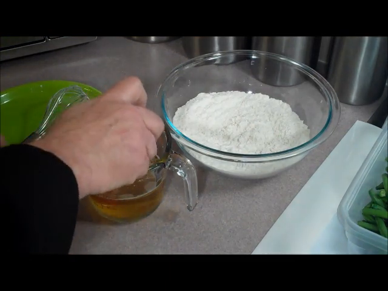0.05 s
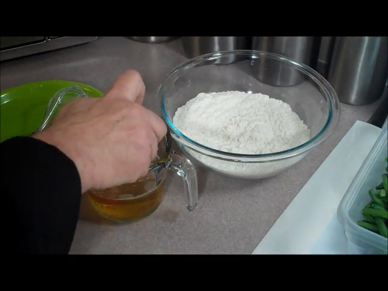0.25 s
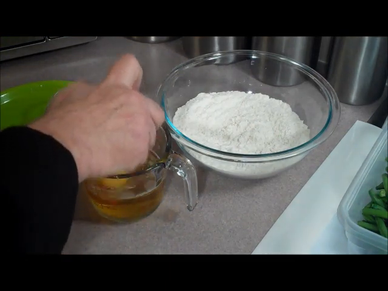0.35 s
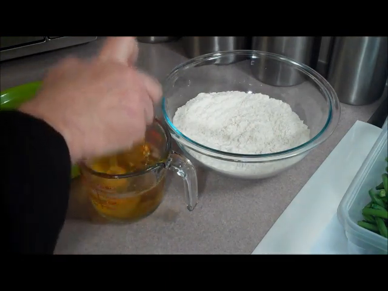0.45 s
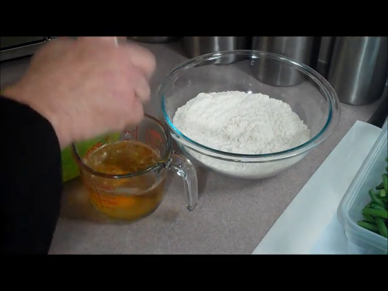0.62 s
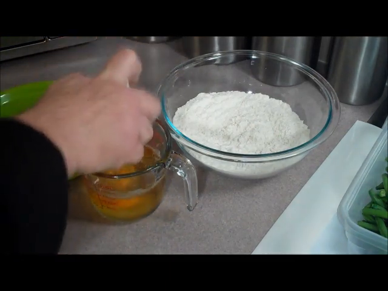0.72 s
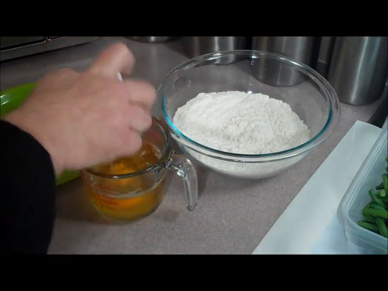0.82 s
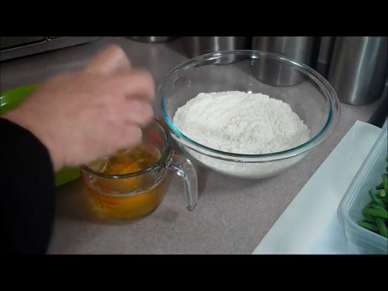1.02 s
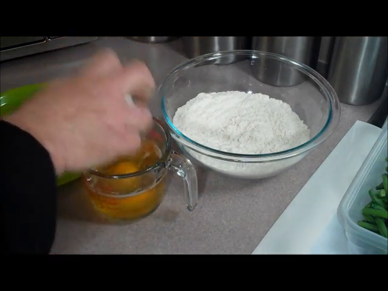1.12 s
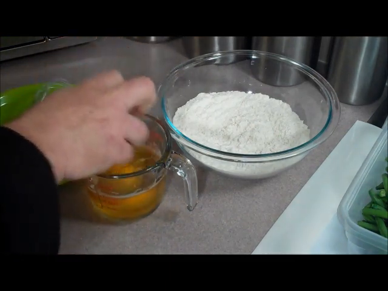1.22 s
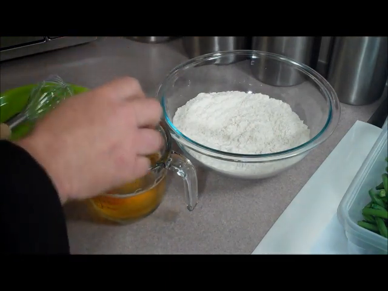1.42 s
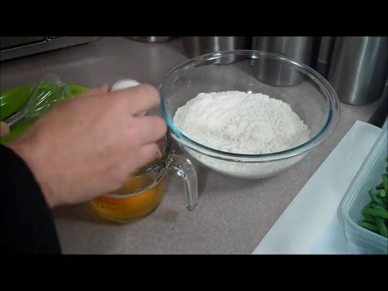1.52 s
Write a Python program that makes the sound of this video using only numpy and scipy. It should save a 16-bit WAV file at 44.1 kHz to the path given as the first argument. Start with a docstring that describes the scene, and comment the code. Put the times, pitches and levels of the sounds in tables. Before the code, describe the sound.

Eggshell crackles close to the microphone in a quiet kitchen, with one sharp clink on a glass rim. The egg plops gently into the cup and drips, before a hollow pop and a light knock from the wet shell.

```python
"""Crunching eggshell, a clink on a glass measuring cup, a rising gloop and drips, then a hollow pop
and a knock of the shell halves: an egg pulled open in a quiet kitchen.
Fractures and contacts are noise snaps plus damped modes of shell or cup. The sinking egg closes an air
pocket, a gliding tone; each drip of white rings a small bubble. Sticky white crackles, the halves rub."""
import sys
import numpy as np
from scipy import signal
from scipy.fft import rfft, irfft
from scipy.io import wavfile
from scipy.ndimage import uniform_filter1d

SR = 44100
rng = np.random.default_rng(int(sys.argv[2]) if len(sys.argv) > 2 else 0)


def unload_wav(signal):
    """Save mono or channel-first audio to the path in sys.argv[1] as 16-bit WAV at rate SR, clipped to [-1, 1]."""
    wavfile.write(
        sys.argv[1],
        SR,
        np.round(np.clip(np.atleast_2d(signal).T, -1, 1) * 32767).astype(np.int16),
    )


N = 68355

# Spectra. Each row: frequency in Hz, relative gain in dB.
ROOM_TONE_EQ = [(20, 0.5), (60, -5.5), (150, -8), (400, -10.5), (1000, -10.5), (2000, -15.5), (4000, -9),
                (8000, -21), (12000, -29), (14500, -47)]
REVERB_EQ = [(150, -15.5), (450, -10.5), (700, -10), (1150, -7.5), (2000, -10.5), (4000, -8), (8000, -8),
             (14000, -9)]
RUB_EQ = [(80, -8), (200, -6), (330, -1.5), (700, -9), (1150, 6.5), (1700, -2.5), (2300, -2), (3400, -5),
          (5000, -7.5), (10000, -35), (14000, -60)]
WET_EQ = [(150, -34), (500, -4.5), (1050, -3), (1450, 3), (1850, 2), (2400, -3), (3000, 1), (3500, -3),
          (3950, -0.5), (4500, -9.5), (6300, -8.5), (7800, -9), (11000, -20.5), (14000, -51)]
CLINK_EQ = [(150, -37), (600, -23), (1600, 3.5), (2600, 2), (4200, 8.5), (5600, 6.5), (7500, 1.5),
            (11000, -2.5), (15000, -26)]
POP_EQ = [(150, -36), (600, -15.5), (1500, 9), (3400, -7), (4700, 5), (6300, -1.5), (9000, -3.5),
          (12000, -11), (15000, -43)]
KNOCK_EQ = [(100, -19), (300, -11), (700, -11), (2000, -1.5), (3300, 2), (5200, 3), (7500, -12.5),
            (11500, -16), (14000, -60)]
CHIP_EQ = [(200, -22), (600, 4.5), (8000, 0.5), (12000, -3), (15000, -41)]
CRACK_EQ = [(150, -31.5), (400, -22.5), (550, -10), (900, -13), (1150, -28), (1550, -16), (2100, 1),
            (2750, -5), (3800, 0), (5000, 1.5), (6000, -2.5), (7100, -2.5), (8200, -7), (9800, -5.5),
            (12500, -20.5), (15000, -36)]
# Resonances. Each row: frequency in Hz, relative level in dB, T60 in seconds.
CUP_MODES = [(3620, 5.5, 0.01), (3910, 15, 0.0095), (4150, 4, 0.01), (3880, -21, 0.08), (5680, -8, 0.018)]
HOLLOW_MODES = [(885, -3, 0.021), (950, -23, 0.07), (1030, -14, .02), (1704, -4, 0.015)]
POP_MODES = [(613, -17, 0.03), (1020, -2, 0.019), (1200, -6, 0.0093), (1420, 2.5, 0.018), (1560, -2, 0.015),
             (2050, -17, .012), (2745, -5, 0.014), (3837, -15, 0.016), (4666, -8.5, 0.011),
             (5720, -13, 0.017), (6400, -14, 0.023)]
KNOCK_MODES = [(1186, -11.5, 0.028), (2243, -3.5, 0.029), (2925, 0, 0.018), (3290, 1.5, 0.012),
               (4760, -1.5, 0.011)]
SHELL_MODES = [(2027, 2, 0.021), (2280, 3.5, 0.015), (3250, -5, 0.019), (3770, 10.5, 0.01),
               (4280, 2.5, 0.015)]
# Envelopes. Each row: time in seconds, level in dB.
RUB_ENVELOPE = [(1.285, -78), (1.30, -56.5), (1.33, -52.5), (1.35, -76), (1.41, -64), (1.45, -64.5),
                (1.5, -77)]
SQUELCH_ENVELOPE = [(0, -52.5), (.05, -66.5), (.1, -74.5), (.42, -73.5), (.64, -67), (.72, -68.5),
                    (.8, -70), (.86, -65), (.9, -55.5), (.935, -62), (.995, -55.5), (1.045, -68.5),
                    (1.2, -62.5), (1.275, -68), (1.319, -56), (1.35, -58.5), (1.40, -56.5), (1.49, -68.5)]
POCKET_ENVELOPE = [(.573, -68), (.577, -50), (.592, -53.5), (.606, -53), (.632, -58), (.645, -76)]
# Kitchen decay. Each row: frequency in Hz, T60 in seconds.
ROOM_T60 = [(200, 0.23), (900, 0.35), (2000, 0.36), (4000, 0.23), (8000, 0.31), (14000, 0.17)]
# Stereo width. Each row: frequency in Hz, left-right correlation.
CORRELATION = [(30, 1), (150, 0.04), (300, 0.77), (2000, 0.78), (4000, 0.47), (7000, 0.22), (12000, -0.18)]
# Stereo balance. Each row: frequency in Hz, left minus right in dB.
BALANCE = [(50, 1), (500, 3), (1500, 3), (4000, 2.5), (8000, 1.9), (12000, -1)]
# Hand bumps. Each row: start in seconds, level in dB, pitch in Hz, T60 in seconds.
BUMPS = [(0.334, -64.5, 127, 0.23), (1.29, -72, 131, 0.13), (1.315, -60, 320, 0.062)]
# Air in the cup. Each row: start in seconds, level in dB, centre in Hz, half-width in octaves,
# decay in seconds.
CUP_AIR = [(.268, -49.5, 970, .13, .05), (1.14, -43.5, 1230, .24, .055)]
# Drips. Each row: start in seconds, bubble level in dB, pitch in Hz, click level in dB, cutoff in Hz.
DRIPS = [(0.5744, -57, 940, -59, 2500), (0.6146, -55, 1720, -61, 2000), (.627, -57, 1660, -66, 2000),
         (.675, -47.5, 1457, -50, 7200), (.709, -47, 1570, -46, 12200), (.754, -58, 1476, -63, 3000),
         (.872, -51.5, 1580, -52, 10000), (.899, -61, 1650, -55, 7060), (0.9437, -56.5, 1450, -64, 10000),
         (1.0039, -56, 1560, -60, 8000), (1.23, -52, 1470, -57, 8000), (1.442, -53, 1890, -60, 4000)]
# Closing air pocket. Each row: time in seconds, pitch in Hz, level in dB.
GLOOP = [(.598, 477, -67), (0.608, 527, -51.5), (.615, 600, -55), (.623, 720, -57), (0.6268, 927, -41),
         (.632, 1030, -46), (.642, 1306, -50.5), (0.655, 1530, -62)]
# Rim contacts. Each row: start in seconds, then contact, cup ring and hollow knock levels in dB.
CLINKS = [(0.2654, -30.5, -25, -37), (0.2822, -37, -58, -63)]
# Shell pops and one knock. Each row: start in seconds, contact level in dB, ring level in dB.
POPS = [(1.138, -30.5, -27.3), (1.1476, -52, -37)]
KNOCK = (1.2918, -38, -39.5)
# Shell chips. Each row: start in seconds, level in dB, centre in Hz, half-width in octaves.
CHIPS = [(0.1397, -55, 7240, 0.84), (.1725, -52, 5400, 0.71), (.18, -45.5, 3970, 7.5),
         (0.192, -45, 3880, 0.26), (.435, -53, 7900, 1.2), (.450, -55.5, 4870, 0.18),
         (.484, -58, 2000, 0.46), (.502, -54, 5030, 1.07), (0.869, -56, 9100, 0.44),
         (.899, -53.5, 3000, 0.42), (0.942, -51, 7400, 1.4), (1.004, -54.5, 4900, 0.29),
         (1.082, -57.5, 5500, 0.7), (1.097, -58, 5530, .7), (1.106, -57, 4900, 0.62),
         (1.231, -47.5, 2820, 1.06), (1.28, -49, 3950, .3), (1.3657, -50, 2480, 0.89),
         (1.383, -52, 2020, 0.67), (1.4124, -45.5, 7500, 1.14), (1.4218, -47.5, 2610, 1.3)]
# Fractures. Each row: start in seconds, level in dB, decay in seconds, tilt above 2 kHz in dB per
# octave, ring level in dB.
CRACKS = [(0.0, -50.5, 0.0051, 10, -53), (.0045, -41.5, 0.0057, -5, -49), (.027, -45.5, 0.0052, -4, -67),
          (0.2004, -39.5, 0.0052, 2, -42.5), (.2042, -30, 0.0017, 0, -27), (.2078, -33.5, 0.0027, 0.5, -35),
          (0.2122, -42, 0.0094, 2, -49), (0.2216, -42, 0.01, -7, -56), (0.2313, -46, 0.0024, -1, -43),
          (.236, -40, 0.003, -4, -34), (0.2417, -32.5, 0.0027, 3, -55), (.248, -41.5, .003, -3, -39),
          (.322, -51.5, 0.0051, -4, -58)]

FFT_SIZE = 2048
BINS_HZ = np.fft.rfftfreq(FFT_SIZE, 1 / SR)


def amp(db):
    return 10 ** (np.asarray(db) / 20)


def unit_rms(x):
    return x / np.sqrt(np.mean(x ** 2) + 1e-20)


def unit_hit(x):
    """Scale to the energy of 5 ms at rms 1."""
    return x * np.sqrt(.005 * SR / (np.sum(x ** 2, -1, keepdims=True) + 1e-20))


def curve(points, hz=BINS_HZ):
    point_hz, value = np.transpose(points)
    return np.interp(np.log(hz + 1), np.log(point_hz), value)


def band_db(centre_hz, half_width_oct):
    return -10 * np.log10(1 + (np.log2((BINS_HZ + 1) / centre_hz) / half_width_oct) ** 4)


def add(mix, start_s, sound):
    part = mix[:, max(round(start_s * SR), 0):][:, :sound.shape[-1]]
    part += sound[..., :part.shape[1]]


def eq(x, gain_db):
    """Minimum-phase filter, gain given on BINS_HZ."""
    cepstrum = irfft(np.log(amp(np.maximum(gain_db, -90))))
    half = len(cepstrum) // 2
    cepstrum[1:half] *= 2
    cepstrum[half + 1:] = 0
    impulse = irfft(np.exp(rfft(cepstrum)))
    return signal.fftconvolve(x, impulse[None, :half], axes=1)


def stereo(x):
    """Mix two independent signals to left and right with the set correlation."""
    correlation = np.clip(curve(CORRELATION), -.98, .98)
    mid = eq(x[:1], 10 * np.log10((1 + correlation) / 2))
    side = eq(x[1:], 10 * np.log10((1 - correlation) / 2))
    return np.vstack([mid + side, mid - side])


def snap(decay_s, gain_db, rise_s=0.00039):
    """A quick run of tiny fractures: a noise burst, whitened, then filtered."""
    t = np.arange(FFT_SIZE) / SR
    envelope = (1 - np.exp(-(t + 1 / SR) / rise_s)) * np.exp(-t / decay_s)
    burst = envelope * rng.standard_normal((2, FFT_SIZE))
    for _ in range(4):  # flatten the spectrum, restore the envelope
        burst = irfft(np.exp(1j * np.angle(rfft(burst))))
        burst *= envelope / np.sqrt(abs(uniform_filter1d(burst ** 2, size=48)) + 1e-14)
    return unit_hit(eq(stereo(burst), gain_db))


def ring(modes, rise_s=0.00065):
    """Damped modes that build up during contact."""
    t = np.arange(SR // 3) / SR
    tones = sum(amp(db - 60 * t / t60_s) * np.sin(2 * np.pi * (hz * t + rng.random()))
                for hz, db, t60_s in modes)
    return unit_hit(tones * (1 - np.exp(-(t / rise_s) ** 2)))


def room_tone(level_db=-67):
    """Faint steady hiss and rumble."""
    lead = SR // 10
    noise = eq(stereo(rng.standard_normal((2, N + lead))), curve(ROOM_TONE_EQ))
    return amp(level_db) * unit_rms(noise[:, lead:lead + N])


def kitchen_reverb(x, gap_s=0.0022, early_db=3, early_s=0.016):
    """Close reflections off counter and bowls, then a short tail."""
    t = np.arange(SR // 2) / SR
    taps = rng.choice([-1., 1.], (2, len(t))) * (rng.random((2, len(t))) < 1 / 8)
    taps *= np.clip(t / gap_s - .5, 0, 1) * amp(early_db * np.exp(-t / early_s))
    hz, frame_s, spectra = signal.stft(taps, SR, nperseg=256)
    decay = amp(-60 * frame_s / curve(ROOM_T60, hz)[:, None])
    tail = signal.istft(spectra * decay, SR, nperseg=256)[1]
    tail /= np.linalg.norm(tail, axis=1, keepdims=True)
    return signal.fftconvolve(x, eq(stereo(tail), curve(REVERB_EQ)), axes=1)[:, :N]


def hand_bumps():
    """Soft low thuds of the hand."""
    out = np.zeros((2, N))
    for start_s, db, hz, t60_s in BUMPS:
        add(out, start_s, amp(db) * ring([(hz, 0, t60_s)], rise_s=0.011))
    return out


def shell_rub():
    """The halves slide against each other and the fingers."""
    grit = eq(stereo(rng.laplace(size=(2, N))), curve(RUB_EQ))[:, :N]
    times_s, db = np.transpose(RUB_ENVELOPE)
    return unit_rms(grit) * np.interp(np.arange(N) / SR, times_s, amp(db), left=0, right=0)


def squelch(clicks_per_s=1500, spread_db=4):
    """Dense tiny clicks of stretching white and shell crumbs."""
    sizes = amp(spread_db * np.minimum(rng.exponential(1, N), 3))
    sizes *= rng.random(N) < clicks_per_s / SR
    grains = eq(stereo(sizes * rng.choice([-1, 1], (2, N))), curve(WET_EQ))[:, :N]
    times_s, db = np.transpose(SQUELCH_ENVELOPE)
    return unit_rms(grains) * amp(np.interp(np.arange(N) / SR, times_s, db))


def drips(t60_s=0.021, glide_per_s=5.1, attack_s=0.00043, cup_db=-10):
    """Each drip clicks, rings a bubble of rising pitch and faintly rings the cup."""
    out = np.zeros((2, N))
    t = np.arange(SR // 10) / SR
    envelope = (1 - np.exp(-(t / attack_s) ** 2)) * amp(-60 * t / t60_s)
    for start_s, bubble_db, hz, click_db, cutoff_hz in DRIPS:
        bubble = envelope * np.sin(2 * np.pi * hz * t * (1 + glide_per_s * t / 2))
        lowpass_db = -10 * np.log10(1 + (BINS_HZ / cutoff_hz) ** 6)
        add(out, start_s, amp(bubble_db) * unit_hit(bubble))
        add(out, start_s, amp(click_db) * snap(0.00403, curve(WET_EQ) + lowpass_db, rise_s=0.00064))
        add(out, start_s, amp(click_db + cup_db) * ring(CUP_MODES))
    return out


def gloop(pocket_hz=476, waver_depth=0.036):
    """Air under the sinking egg: a rising tone as the pocket closes, over a held low note."""
    out = np.zeros((2, N))
    times_s, hz, db = np.transpose(GLOOP)
    t = np.arange(times_s[0], times_s[-1], 1 / SR)
    waver = unit_rms(uniform_filter1d(rng.standard_normal(N), size=120))[:len(t)]
    pitch_hz = np.interp(t, times_s, hz) * (1 + waver_depth * waver)
    glide = unit_rms(np.sin(2 * np.pi * np.cumsum(pitch_hz) / SR))
    add(out, times_s[0], amp(np.interp(t, times_s, db)) * glide)
    times_s, db = np.transpose(POCKET_ENVELOPE)
    t = np.arange(times_s[0], times_s[-1], 1 / SR)
    note = unit_rms(np.sin(2 * np.pi * pocket_hz * (t - times_s[0])))
    add(out, times_s[0], amp(np.interp(t, times_s, db)) * note)
    return out


def cup_air():
    """Rough ring of the air in the cup after a blow."""
    out = np.zeros((2, N))
    t = np.arange(SR // 3) / SR
    for start_s, db, hz, half_width_oct, decay_s in CUP_AIR:
        burst = stereo(rng.standard_normal((2, len(t))) * np.exp(-t / decay_s))
        add(out, start_s, amp(db) * unit_hit(eq(burst, band_db(hz, half_width_oct))))
    return out


def rim_clinks():
    """Shell strikes the rim: contact snap, glass ring, hollow knock."""
    out = np.zeros((2, N))
    for start_s, contact_db, cup_db, hollow_db in CLINKS:
        add(out, start_s, amp(contact_db) * snap(0.0031, curve(CLINK_EQ)))
        add(out, start_s, amp(cup_db) * ring(CUP_MODES, rise_s=0.0012))
        add(out, start_s, amp(hollow_db) * ring(HOLLOW_MODES, rise_s=0.0011))
    return out


def shell_pop_and_knock():
    """The wet shell pops hollowly, then its halves meet and ring."""
    out = np.zeros((2, N))
    for start_s, contact_db, ring_db in POPS:
        add(out, start_s, amp(contact_db) * snap(0.00245, curve(POP_EQ), rise_s=0.00185))
        add(out, start_s, amp(ring_db) * ring(POP_MODES, rise_s=0.0014))
    start_s, contact_db, ring_db = KNOCK
    add(out, start_s, amp(contact_db) * snap(0.0044, curve(KNOCK_EQ)))
    add(out, start_s, amp(ring_db) * ring(KNOCK_MODES, rise_s=0.00039))
    return out


def shell_cracks(detune=0.014):
    """Each fracture snaps and rings the shell; small chips only tick."""
    out = np.zeros((2, N))
    octaves = np.maximum(np.log2((BINS_HZ + 1) / 4000), -1)
    for start_s, db, decay_s, tilt_db_per_oct, ring_db in CRACKS:
        add(out, start_s, amp(db) * snap(decay_s, curve(CRACK_EQ) + tilt_db_per_oct * octaves))
        modes = [(hz * (1 + detune * rng.uniform(-1, 1)), mode_db, t60_s)
                 for hz, mode_db, t60_s in SHELL_MODES]
        add(out, start_s, amp(ring_db) * ring(modes, rise_s=0.00043))
    for start_s, db, hz, half_width_oct in CHIPS:
        gain_db = band_db(hz, half_width_oct) + curve(CHIP_EQ)
        add(out, start_s, amp(db) * snap(0.0038, gain_db, rise_s=.0005))
    return out


def scene():
    direct = shell_cracks() + rim_clinks() + shell_pop_and_knock() + cup_air() + hand_bumps()
    direct += gloop() + drips() + squelch() + shell_rub()
    return direct + kitchen_reverb(direct) + room_tone()


def record(dry, cutoff_hz=14900):
    """Lean slightly left, then low-pass."""
    lean_db = curve(BALANCE) / 2
    leaned = np.vstack([eq(dry[:1], lean_db), eq(dry[1:], -lean_db)])[:, :N]
    lowpass = signal.firwin(161, cutoff_hz, window=("kaiser", 8), fs=SR)
    return signal.oaconvolve(leaned, lowpass[None], "same")


dry = scene()
out = record(dry)
unload_wav(out)
```